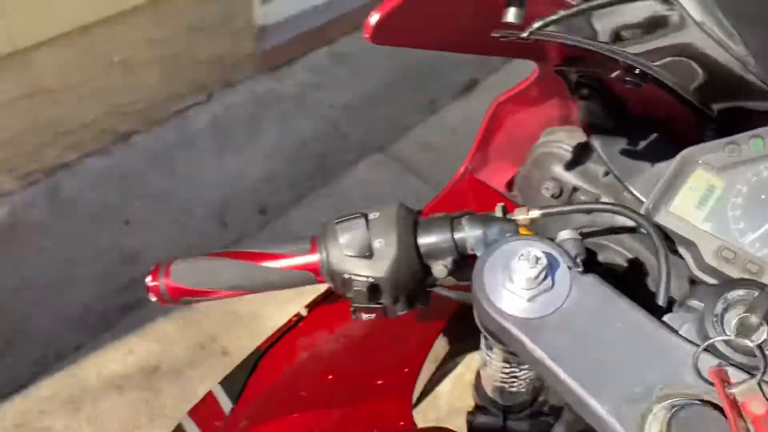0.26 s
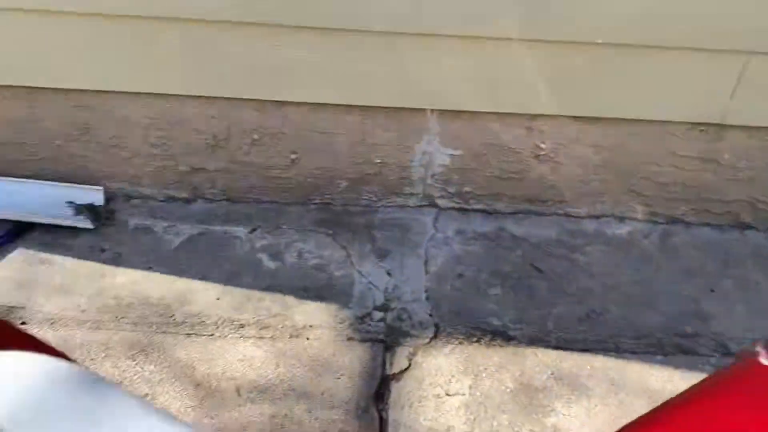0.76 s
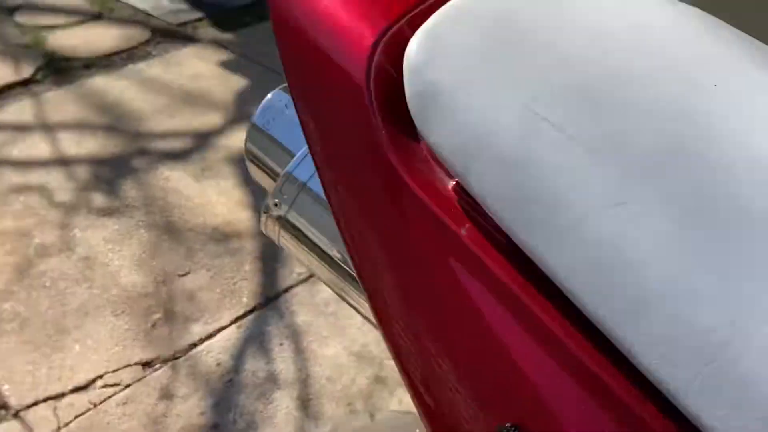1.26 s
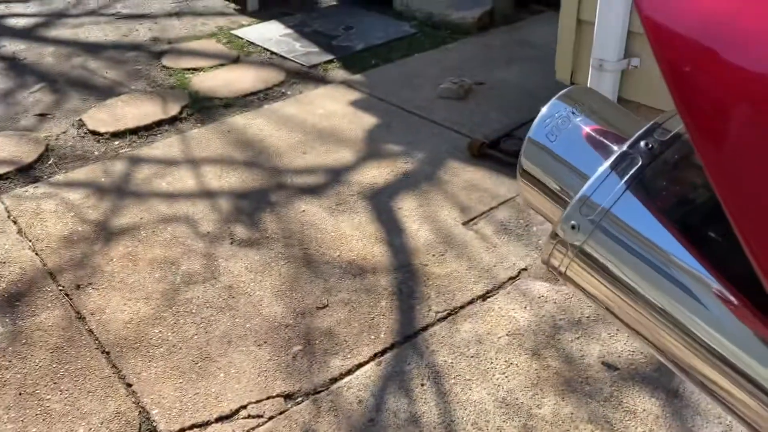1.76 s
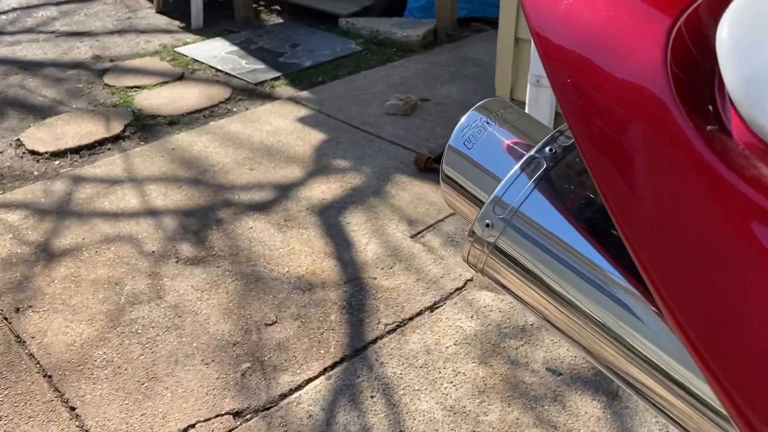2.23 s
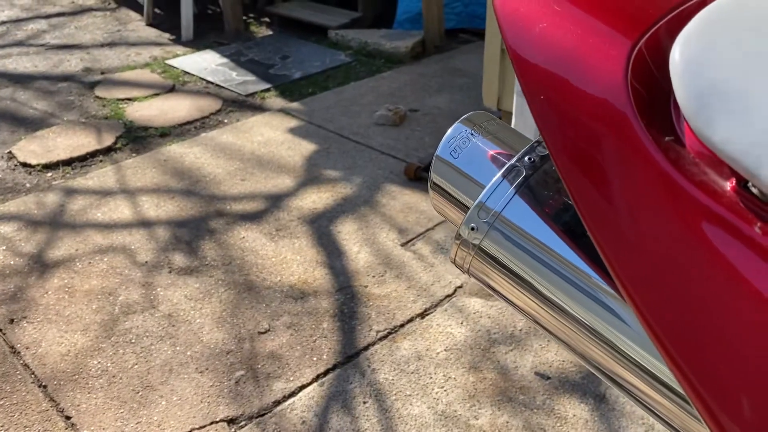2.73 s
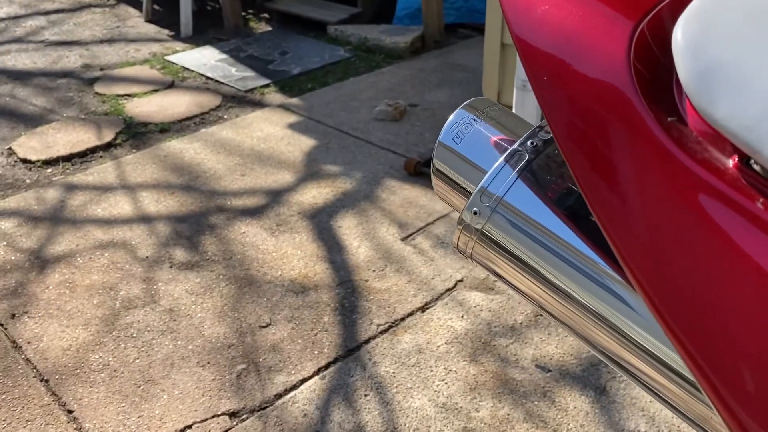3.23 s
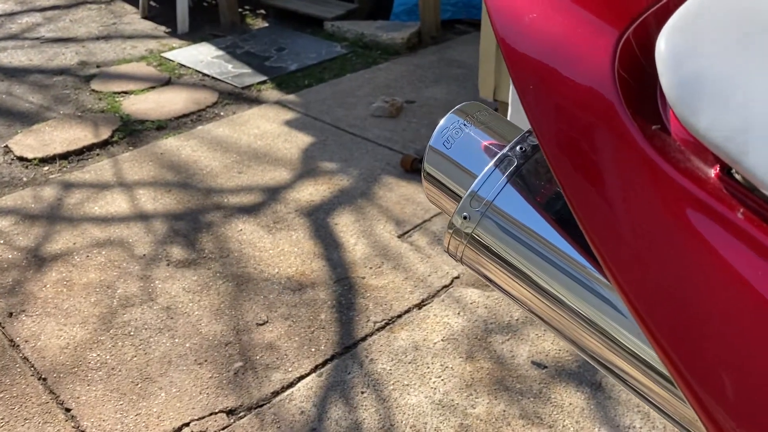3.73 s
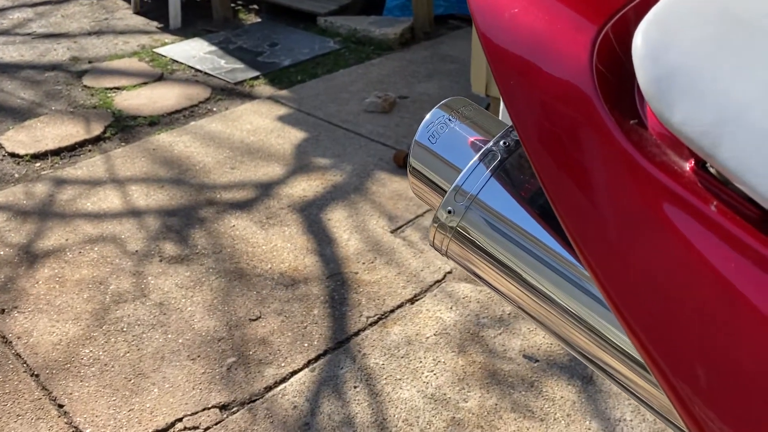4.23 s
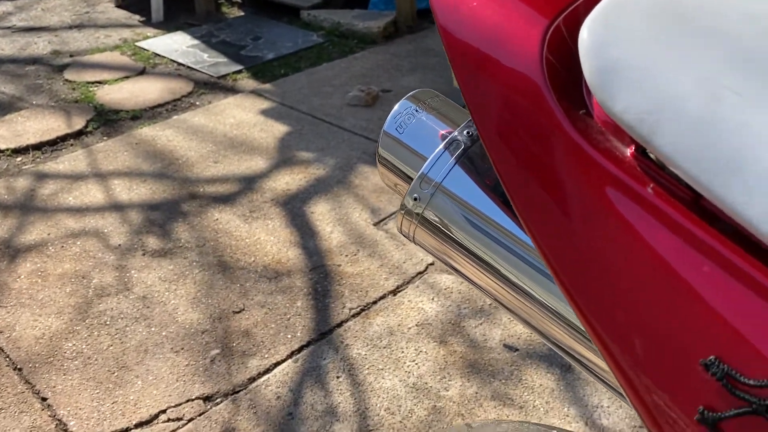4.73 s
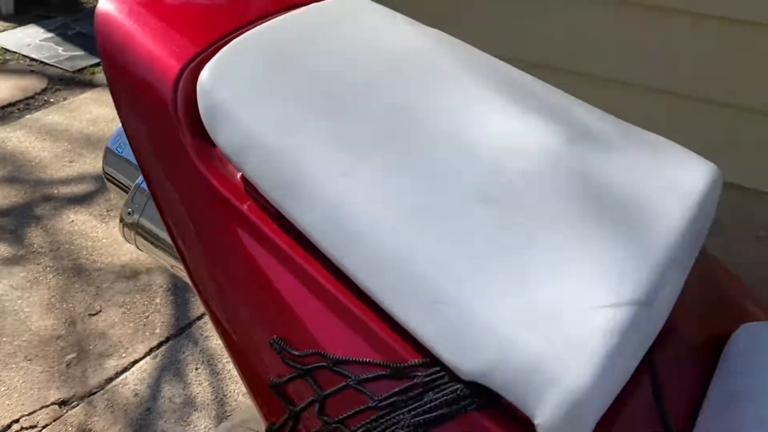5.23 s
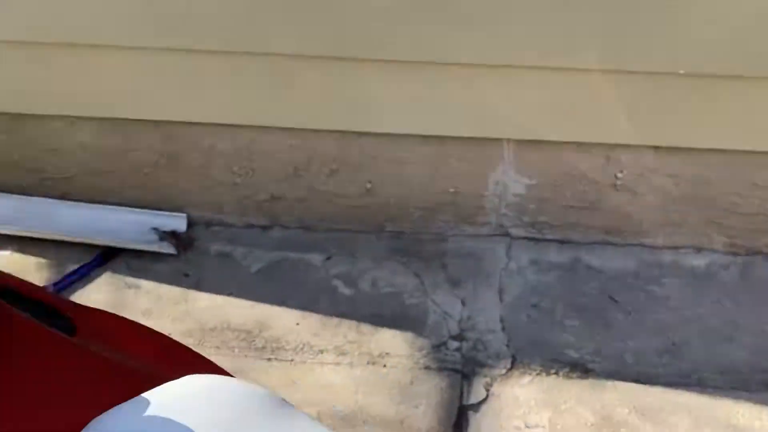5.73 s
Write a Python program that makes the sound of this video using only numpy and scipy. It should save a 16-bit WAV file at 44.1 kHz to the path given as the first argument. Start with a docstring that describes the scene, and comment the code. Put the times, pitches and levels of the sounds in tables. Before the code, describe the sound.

Motorcycle engine idling close by, several quick raspy revs with falling coast-downs and soft thuds, ending in an uneven, muffled putter.

```python
"""A motorcycle idles in short falling hums under a hiss; four blips follow, then a lumpy idle by a house wall.
Each firing of the four-cylinder engine is a pulse that the silencer stretches into a chirp, low tones last.
On a shut throttle the pistons only pump air and the pipe hums; late burns thud in it.
Valve gear and airflow hiss, gears whirr, and ground and wall send back dull echoes.
The listener swings from the tank to the tail pipe and away again, which changes level and colour."""
import sys
import numpy as np
from scipy import signal
from scipy.fft import rfft, irfft, next_fast_len
from scipy.io import wavfile
from scipy.ndimage import uniform_filter1d

SR = 44100
rng = np.random.default_rng(int(sys.argv[2]) if len(sys.argv) > 2 else 0)


def waveform_to_disk(signal):
    """Save audio, clipped to [-1, 1], as 16-bit WAV at the path in sys.argv[1]."""
    frames = np.transpose(np.atleast_2d(signal))
    scaled = np.clip(frames, -1, 1) * 32767
    samples = np.round(scaled).astype(np.int16)
    wavfile.write(sys.argv[1], SR, samples)


def amplitude_ratio(level_db):
    """Convert a level in decibels to the matching linear amplitude (field) ratio."""
    exponent = np.asarray(level_db, float) / 20
    return 10 ** exponent


N = 263712
SIZE = next_fast_len(N + SR)
BINS_HZ = np.arange(SIZE // 2 + 1) * SR / SIZE
GRID_S = np.arange(0, N + 64, 64) / SR   # coarse times for the slow controls

# Phase lag of the silencer: low tones leave the baffles late, and the main
# chamber holds back tones near its resonance at 191.6 Hz (101 Hz wide).
BAFFLE_LAG = 2 * np.pi * 1.607 * np.log(1 + BINS_HZ / 68.1)
BAFFLE_LAG = BAFFLE_LAG + 2 * 0.5 * np.arctan((BINS_HZ - 191.6) / 101)


def in_time(rows):
    """Columns of a table at every sample."""
    s, *columns = np.transpose(rows)
    return [np.interp(np.arange(N) / SR, s, c) for c in columns]


def on_grid(rows):
    """Columns of a table on the coarse time grid."""
    s, *columns = np.transpose(rows)
    return [np.interp(GRID_S, s, c) for c in columns]


def fine(x):
    """A coarse control at every sample."""
    return np.interp(np.arange(N) / SR, GRID_S, x)


def at_hz(points, hz):
    """A table of frequency and level, read on a log frequency axis."""
    table_hz, db = np.transpose(points)
    return np.interp(np.log(hz + 1), np.log(table_hz), db)


def colour(x, points, lag=0):
    """Shapes x by a spectrum table and an optional phase lag."""
    return irfft(rfft(x, SIZE) * amplitude_ratio(at_hz(points, BINS_HZ)) * np.exp(-1j * lag), SIZE)[..., :N]


def band(x, low_hz, high_hz):
    """Keeps a band of frequencies, with steep edges."""
    return signal.sosfilt(signal.butter(4, [low_hz, high_hz], "band", fs=SR, output="sos"), x)


def running_rms(x, span_s):
    """Level of x over a sliding span, smoothed twice."""
    size = int(span_s * SR)
    power = uniform_filter1d(uniform_filter1d(x ** 2, size=size), size=size)
    return np.sqrt(np.abs(power) + 1e-20)


# Throttle blips, the second row a brief flutter after the first: (opens [s], shuts [s], exhaust level [dB],
# weak firings down by, at low speed [dB], scatter between firings [dB], fronts steepen over [s],
# burn builds over [s])
THROTTLE_BLIPS = [(2.137, 2.36, 0.5, 5.5, 2.3, .14, 0.052), (2.436, 2.482, -7.5, 1, 2.5, 0.36, 0.028),
                  (2.559, 2.763, -1, 8, 2.5, 0.03, 0.02), (3.317, 3.516, -1, 0.5, 1, 0.084, 0.033),
                  (3.987, 4.211, -1, 16.5, 0.9, 0.021, 0.013)]
RELIGHT_S = 4.765   # idle fuelling returns after the last coast-down


def throttle():
    """How far each blip, all blips together, the idle burn and the shut throttle are at work."""
    t = GRID_S
    idle_builds_s, blip_dies_s = 0.032, 0.056
    gates = np.array([np.clip((t - opens) / build_s, 0, 1) * np.clip(1 - (t - shuts) / blip_dies_s, 0, 1)
                      for opens, shuts, *_, build_s in THROTTLE_BLIPS])
    opened = gates.sum(axis=0)
    first_open_s, first_build_s = THROTTLE_BLIPS[0][0], THROTTLE_BLIPS[0][-1]
    idle = np.clip(1 - (t - first_open_s) / first_build_s, 0, 1)
    idle = idle + np.clip((t - RELIGHT_S) / idle_builds_s, 0, 1)
    shut = np.clip(1 - opened - idle, 0, 1)
    return gates, opened, idle, shut


# Firings that fail: (time [s], change of the hum [dB])
MISFIRES = [(.67, -8), (1.314, -9), (1.951, -9.5), (2.068, -8.5), (2.109, -8.5), (2.315, -6.5),
            (4.984, -11), (5.178, -14.5)]


def hum_dips(idle, shut):
    """Brief losses of hum: after the throttle shuts, before firing returns, in a loping idle, at misfires."""
    t = GRID_S
    dip_db, dip_after_s, dip_s = -3, 0.06, 0.023
    sag_db, sag_s = -5.5, 0.051
    gap_db, lope_s = -3, 0.014
    misfire_s = 0.0092
    dips_db = sum(dip_db * np.exp(-((t - shuts - dip_after_s) / dip_s) ** 2)
                  for _, shuts, *_ in THROTTLE_BLIPS)
    returns_s = [row[0] for row in THROTTLE_BLIPS] + [RELIGHT_S]
    dips_db += shut * sum(sag_db * np.exp(-((t - s) / sag_s) ** 2) for s in returns_s)
    # between hard firings the idle sinks
    near_hard = np.max([np.exp(-((t - s - lope_s) / lope_s) ** 2) for s, _ in HARD_FIRINGS], axis=0)
    dips_db += gap_db * idle * (t > RELIGHT_S) * (1 - near_hard)
    dips_db += sum(db * np.exp(-((t - s) / misfire_s) ** 2) for s, db in MISFIRES)
    return dips_db


# Silencer heard at idle, also the colour of the rumble: (frequency [Hz], relative level [dB])
IDLE_PIPE = [(22, -28.5), (45, -11.5), (110, 0.5), (160, -2), (212, 4), (265, -13.5), (318, -5),
             (370, -15.5), (425, -13.5), (480, -32), (600, -40), (900, -43), (1500, -94.5)]
# Multiples of the stroke rate on an open throttle: (frequency [Hz], relative level [dB])
OPEN_THROTTLE = [(50, -32), (110, -6), (160, -9.5), (205, -5), (260, -17), (320, -9), (400, -15),
                 (480, -19), (600, -34), (900, -42)]
# Multiples on a shut throttle: (frequency [Hz], relative level [dB])
PUMPED_AIR = [(50, -26), (90, -13), (128, -5), (155, -10), (180, -9), (205, -5.5), (250, -19), (290, -17),
              (350, -28), (420, -18), (500, -24), (700, -30.5), (900, -32), (1200, -34.5), (2000, -60.5)]
# Burnt pulses lose their top to the fronts: (frequency [Hz], change of level [dB])
BAFFLES = [(20, 3.5), (520, -1.56), (640, -7), (900, -74)]
# Exhaust colour fully away from the pipe mouth: (frequency [Hz], change of level [dB])
OFF_AXIS = [(50, 7.5), (105, -6), (160, -9), (210, 1.5), (320, -5), (500, -8.5)]


def multiples(per_s, heard_db, away, opened, idle, shut, blip_db):
    """Strength of eleven multiples of the stroke rate: burning at idle or open throttle, pumping when shut."""
    idle_db = -13.5
    pumping_db_per_octave = -6   # pumped air is a rounder pulse: each multiple falls further
    waver_db, waver_per_s = 4, 22
    gains = []
    for k in range(1, 12):
        hz = k * per_s
        burnt = idle * amplitude_ratio(idle_db + at_hz(IDLE_PIPE, hz))
        burnt = burnt + opened * amplitude_ratio(blip_db + at_hz(OPEN_THROTTLE, hz))
        burnt = burnt * amplitude_ratio(at_hz(BAFFLES, hz))
        pumped = shut * amplitude_ratio(at_hz(PUMPED_AIR, hz) + pumping_db_per_octave * np.log2(k))
        gains.append((burnt + pumped) * amplitude_ratio(heard_db + away * at_hz(OFF_AXIS, hz)))
    # away from the pipe mouth the three lowest multiples waver, each by itself
    draws = rng.standard_normal((300, 3))
    for k in range(3):
        waver = np.interp(GRID_S * waver_per_s, np.arange(len(draws)), draws[:, k])
        gains[k] = gains[k] * amplitude_ratio(waver_db * away * waver)
    return gains


# Lumpiness of the idle: (time [s], scatter between firings [dB])
IDLE_SCATTER = [(0, 2.97), (.8, 1.4), (1.2, 1.06), (1.9, 0.66), (2.15, 1.5), (4.8, 2.2), (5.98, 2.36)]


def unevenness(per_s, behind, idle, shut, weaker_db, scatter_db):
    """Weak firings and scatter: the blips' alternation evens out above about 161 strokes per second."""
    idle_weaker_db, coast_weaker_db, coast_scatter_db = 3, 2.1, 0.45
    weaker_db = weaker_db / (1 + np.exp((per_s - 161) / 4.3))
    weaker_db = weaker_db + idle_weaker_db * idle * (1 - behind / 2) + coast_weaker_db * shut
    scatter_db = scatter_db + on_grid(IDLE_SCATTER)[0] * idle + coast_scatter_db * shut
    return weaker_db, scatter_db


# Engine speed: (time [s], exhaust strokes per second [1/s])
ENGINE_SPEED = [(0.0, 60.7), (0.22, 55), (0.3, 54), (0.6, 51), (0.8, 52.2), (1.28, 54), (1.45, 52.8),
                (1.88, 53.6), (2.0, 50.5), (2.14, 52.8), (2.23, 87.3), (2.35, 116.4), (2.43, 130),
                (2.5, 128), (2.575, 115.7), (2.66, 129), (2.78, 183), (2.83, 181), (2.95, 163), (3.1, 131),
                (3.315, 90.3), (3.38, 111.6), (3.45, 169), (3.51, 212.5), (3.58, 227), (3.73, 197),
                (3.81, 173.6), (4.005, 121.7), (4.15, 148), (4.21, 174), (4.265, 191.5), (4.41, 164.7),
                (4.56, 128), (4.75, 97), (4.95, 82), (5.02, 71.3), (5.18, 61.5), (5.5, 53.1), (5.98, 52.6)]
# Where the listener stands: (time [s], exhaust level [dB], behind the pipe [0-1], change of hiss [dB])
LISTENER = [(0.0, -10.5, 0, 3.5), (0.5, -8.5, 0.02, -1), (0.8, -6.5, 0, 1.5), (1.2, -3.5, 0.8, 0),
            (1.5, -1.5, 0.66, 0), (3.0, -0.5, 0.5, 2.5), (4.4, -2, 0.67, 1), (4.75, -7.5, 1, -3.5),
            (5.0, -10.5, 1, -5.5), (5.3, -13.5, 0.9, -9), (5.98, -15.5, 0.5, -8.5)]
# Starting levels of the fronts' crack at 150 strokes per second, and their change per octave of speed:
# (idle [dB], open [dB], shut [dB], open slope [dB per octave], shut slope [dB per octave])
CRACK_LEVELS = (-41, -18.5, -69.5, 11.5, 29)
# Starting levels of the mechanical hiss, with the same columns:
# (idle [dB], open [dB], shut [dB], open slope [dB per octave], shut slope [dB per octave])
HISS_LEVELS = (-47.5, -41.5, -45.5, 3, 5.5)


def controls():
    """What throttle, speed and standpoint make of the multiples, the crack, the hiss and evenness of firing."""
    t, (per_s,) = GRID_S, on_grid(ENGINE_SPEED)
    near_db, behind, hiss_db = on_grid(LISTENER)
    away = np.clip(1 - behind, 0, 1)
    gates, opened, idle, shut = throttle()
    blip_db, weaker_db, scatter_db = np.array(THROTTLE_BLIPS)[:, 2:5].T @ gates
    weaker_db, scatter_db = unevenness(per_s, behind, idle, shut, weaker_db, scatter_db)
    heard_db = near_db + hum_dips(idle, shut)
    gains = multiples(per_s, heard_db, away, opened, idle, shut, blip_db)

    octaves = np.log2(per_s / 150)
    crack_db, mechanical_db = [
        20 * np.log10(idle * amplitude_ratio(idle_db)
                      + opened * amplitude_ratio(open_db + open_slope * octaves + blip_db)
                      + shut * amplitude_ratio(shut_db + shut_slope * octaves))
        for idle_db, open_db, shut_db, open_slope, shut_slope in (CRACK_LEVELS, HISS_LEVELS)]
    # fronts steepen during each blip
    steep = sum(gate * np.clip((t - row[0]) / row[5], .05, 1) for gate, row in zip(gates, THROTTLE_BLIPS))
    steep = steep + 1 - opened
    crack_db = crack_db + 0.82 * near_db + 20 * np.log10(steep)
    rasp_db = -3 + 16 * octaves   # treble of the fronts rises with speed
    # the hiss jumps as the throttle opens, then settles
    gasp_db, gasp_s = 2.5, 0.21
    hiss_db += sum(gasp_db * gate * np.exp(-np.abs(t - row[0]) / gasp_s)
                   for gate, row in zip(gates, THROTTLE_BLIPS))
    return per_s, gains, crack_db, rasp_db, mechanical_db + hiss_db, weaker_db, scatter_db


# One strong firing in so many, one row for each blip: (strokes per strong firing [count])
STRONG_EVERY = [3, 2, 2, 2, 2]


def firings(per_s, weaker_db, scatter_db, chance):
    """Counts the strokes and gives each its own timing and strength."""
    turns = np.cumsum(per_s) / SR + 0.303
    # uneven burns push the crank a little ahead or behind
    turns += 0.011 * scatter_db * np.interp(turns, np.arange(len(chance)), chance[:, 2])
    stroke = np.round(turns).astype(int)
    # strong and weak firings take turns, and each blip begins with a strong one
    opens = (np.array([0] + [row[0] for row in THROTTLE_BLIPS]) * SR).astype(int)
    blip = np.searchsorted(opens, np.arange(N), side="right") - 1
    every = np.append(2, STRONG_EVERY)[blip]
    first = stroke[opens][blip] + 1
    weak = (stroke - first) % every > 0
    strength = amplitude_ratio(-weaker_db * weak + scatter_db * chance[stroke, 0])
    strength = strength * 2 / (1 + amplitude_ratio(-weaker_db))
    return turns, stroke, uniform_filter1d(strength, size=90)


def pulse_body(gains, turns, strength):
    """The hum: multiples of the stroke rate, each pulse stretched into a chirp by the silencer."""
    body = 0
    for k, gain in enumerate(gains, start=1):
        # pumping goes on without a burn, so the first multiple follows firing strength only in part
        follow = .7 if k == 1 else .95
        body = body + np.sqrt(2) * fine(gain) * np.cos(2 * np.pi * k * turns) * strength ** follow
    return colour(body, [(20, 0.02), (20000, 0.016)], BAFFLE_LAG)


# Open-throttle colour of the pulse fronts: (frequency [Hz], relative level [dB])
FRONT_COLOUR = [(310, -5.5), (520, 0.5), (628, 0.5), (843, -5), (1080, -1), (1300, -4), (1600, -16),
                (1900, -24), (2910, -36), (3420, -29.5), (5000, -75), (6500, -60.5), (11000, -120)]


def front_crack(turns, stroke, strength, chance, crack_db, rasp_db, hiss_db):
    """Sharp pulse fronts, one click a stroke, each trailing a puff of turbulence."""
    puff_share, puff_decay_s = .026, 0.0053
    clicks = np.maximum(np.diff(np.floor(turns), prepend=0), 0)
    # fronts vary more than the body of the pulse
    fronts = strength ** 1.07 * clicks * amplitude_ratio(1.1 * chance[stroke, 1])
    puff = signal.lfilter([1], [1, -np.exp(-1 / (puff_decay_s * SR))], fronts) * rng.standard_normal(N)
    crack = colour(fronts + puff_share * puff, FRONT_COLOUR, BAFFLE_LAG)
    crack += amplitude_ratio(rasp_db) * band(crack, 1248, 4000)
    # fronts weaken further where their level sinks towards the hiss
    load = np.clip((crack_db - hiss_db + 7.0) / 17.2, .3, 1)
    return crack * load * amplitude_ratio(crack_db - 1.0) / running_rms(band(crack, 560, 1800), 0.33)


def burn_rumble(body, scatter_db):
    """Turbulent noise in the pipe, stronger the rougher the burn, partly unlike left and right."""
    share_per_db = 0.21   # of the body's level, per dB of scatter
    mid, side = colour(rng.standard_normal((2, N)), IDLE_PIPE)
    level = share_per_db * (scatter_db + 0.11) * running_rms(body, 0.2) / mid.std()
    return level * (mid + 0.32 * side * [[1], [-1]])


def exhaust():
    """One pulse a stroke: the body, the crack of its front and the rumble, with what drives the hiss."""
    per_s, gains, *rest = controls()
    per_s, crack_db, rasp_db, hiss_db, weaker_db, scatter_db = map(fine, [per_s, *rest])
    chance = rng.standard_normal((1000, 3))   # a row a stroke: strength, front, timing
    turns, stroke, strength = firings(per_s, weaker_db, scatter_db, chance)
    body = pulse_body(gains, turns, strength)
    crack = front_crack(turns, stroke, strength, chance, crack_db, rasp_db, hiss_db)
    return body, crack, burn_rumble(body, scatter_db), turns, hiss_db, strength


# Colour of the hiss: (frequency [Hz], relative level per Hz [dB])
HISS_COLOUR = [(290, -11.5), (500, -3.5), (718, -7.5), (1080, -12.5), (1570, -20.5), (2690, -17.5),
               (3300, -19.5), (4000, -25), (5300, -27), (7310, -30), (9000, -39.5), (10500, -30),
               (13000, -39), (14500, -39), (16000, -41.5)]
# Left-right difference of the hiss: (frequency [Hz], change of the side part [dB])
HISS_SIDE = [(60, -27.5), (110, -14), (200, -13.5), (380, 4.5), (700, -4.5), (1290, 4), (2380, 0),
             (4400, -8.5), (6200, -2), (16000, 5.5)]


def hiss(turns, hiss_db, strength):
    """Valve gear and airflow: wide noise that swells with each stroke, partly unlike left and right."""
    swell = amplitude_ratio(0.93 * np.cos(2 * np.pi * turns)) * strength ** 0.24
    mid, side = rfft(rng.standard_normal((2, N)) * swell, SIZE)
    # above 6200 Hz one ear lags: in step at 7150 Hz, a full turn apart every 3950 Hz
    high = BINS_HZ > 6200
    half_turn = np.pi * (BINS_HZ - 7150) / 3950
    side = np.where(high, 1j * mid * np.sin(half_turn), side)
    mid = mid * np.where(high, np.cos(half_turn), 1)
    mid, side = colour(irfft([mid, side], SIZE)[:, :N], HISS_COLOUR)
    level = amplitude_ratio(hiss_db) / band(mid, 2100, 11000).std()
    return level * (mid + colour(side, HISS_SIDE) * [[1], [-1]]) * amplitude_ratio([[.8], [-.8]])


# Ringing of cases and fairing: (frequency [Hz], width [Hz], relative level [dB])
CASE_RINGS = [(1130, 83, 11), (1960, 470, 1.5), (2600, 210, -3.5)]
# Whirr heard beside the engine: (time [s], level of its middle part [dB])
WHIRR_LEVEL = [(0, -42), (.5, -45.5), (1.0, -43.5), (1.4, -47.5), (4.9, -71.5), (5.4, -53), (5.98, -55.5)]


def whirr():
    """Gear noise heard through a few case resonances."""
    shape = sum(amplitude_ratio(db) / (1 + ((BINS_HZ - hz) / width_hz * 2) ** 2) for hz, width_hz, db in CASE_RINGS)
    mid, side = irfft(rfft(rng.standard_normal((2, SIZE))) * shape, SIZE)[:, :N]
    return amplitude_ratio(in_time(WHIRR_LEVEL)[0]) / mid.std() * (mid + .6 * side * [[1], [-1]])


# Ground and wall: (delay [s], left level [dB], right level [dB])
ECHOES = [(.0031, -12, -23.5), (.0078, -11.5, -17), (0.0109, -36.5, -42)]


def yard(x):
    """Direct sound plus a few duller echoes, different at each ear."""
    dull = band(x, 43.3, 3000)
    out = np.array([x, x])
    for delay_s, *side_db in ECHOES:
        late = np.pad(dull, (int(delay_s * SR), 0))[:N]
        out = out + amplitude_ratio(side_db)[:, None] * late
    return out


# The listener turning: (time [s], left over right [dB])
LISTENER_TURN = [(0.0, 1.0), (1.1, 1.5), (1.51, 0.5), (2.83, 0.5), (3.03, -1.0), (3.61, 1.0), (3.88, -0.5),
                 (4.16, 1.0), (4.5, -1.0), (5.98, 1.5)]


def turn_head(x):
    """Tilts the balance between left and right as the listener turns."""
    return x * amplitude_ratio(in_time(LISTENER_TURN)[0] / 2 * [[1], [-1]])


def single_burns(events, points):
    """Lone pulses through the silencer, each a chirp of the given peak."""
    clicks = np.zeros(N)
    for s, db in events:
        clicks[int(s * SR)] = amplitude_ratio(db)
    height = np.abs(irfft(amplitude_ratio(at_hz(points, BINS_HZ)) * np.exp(-1j * BAFFLE_LAG))).max()
    return colour(clicks, points, BAFFLE_LAG) / height


# Late burns on a shut throttle: (time [s], peak before echoes [dB])
LATE_BURNS = [(2.43, -21.5), (2.88, -13.5), (3.595, -18.5), (4.319, -13.5)]
# Colour of a late burn: (frequency [Hz], relative level [dB])
THUD_COLOUR = [(25, -25.5), (45, -0.5), (110, 10.5), (220, -11), (400, -5.5), (700, -53), (1500, -90)]


def late_burns():
    """Leftover fuel burns in the pipe and thuds."""
    return single_burns(LATE_BURNS, THUD_COLOUR)


# Hard firings that stand out of a loping idle: (time [s], relative peak [dB])
HARD_FIRINGS = [(4.77, -24), (4.847, -12.5), (5.014, -13), (5.138, -14), (5.191, -14), (5.223, -18),
                (5.279, -19), (5.385, -15), (5.426, -14), (5.536, -24), (5.575, -16), (5.63, -20),
                (5.683, -22.5), (5.726, -15), (5.832, -22), (5.871, -22.5), (5.926, -19)]
# Colour of a hard idle firing: (frequency [Hz], relative level [dB])
PUTT_COLOUR = [(25, -29), (50, -8.5), (110, 2), (200, 3.5), (300, -7.5), (450, -11.5), (650, -25.5),
               (900, -47.5), (1500, -72.5)]


def hard_firings():
    """Single strong burns of the lumpy idle, each a low chirp from the silencer."""
    return amplitude_ratio(1.5) * single_burns(HARD_FIRINGS, PUTT_COLOUR)


# The seat shading the pipe: (time [s], share [0-1])
SEAT_SHADOW = [(0, 0), (4.9, 0), (5.2, 0.97), (5.98, 1)]
# Colour behind the seat: (frequency [Hz], change of level [dB])
SHADED_COLOUR = [(240, 0.5), (400, -8.5), (1000, -14)]


def seat_shade(x):
    """Fades towards a duller sound as the seat comes between pipe and listener."""
    share = np.clip(in_time(SEAT_SHADOW)[0], 0, 1)
    return x + share * (colour(x, SHADED_COLOUR) - x)


def scene():
    """Engine beside the wall, the bright part a little to the left."""
    body, crack, rumble, *gear = exhaust()
    body += late_burns() + hard_firings()
    low = seat_shade(turn_head(yard(body) + rumble))
    bright = yard(crack) * amplitude_ratio([[1.3], [-1.3]])
    return low + bright + hiss(*gear) + whirr()


def top_cut(x):
    """Nothing passes above the cut-off."""
    return signal.sosfilt(signal.butter(12, 16770, fs=SR, output="sos"), x)


def record(dry):
    """Rounds the loudest peaks softly, below a ceiling of 1.09."""
    rounded = dry / (1 + (dry / 1.09) ** 4) ** (1 / 4)
    return top_cut(rounded)


dry = scene()
out = record(dry)
waveform_to_disk(out)
```